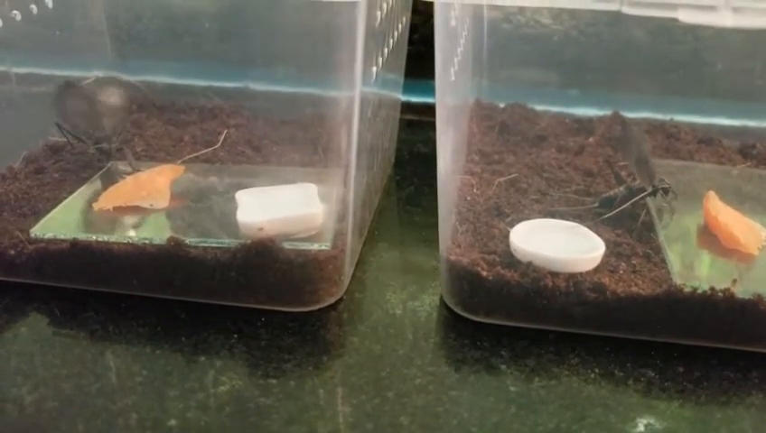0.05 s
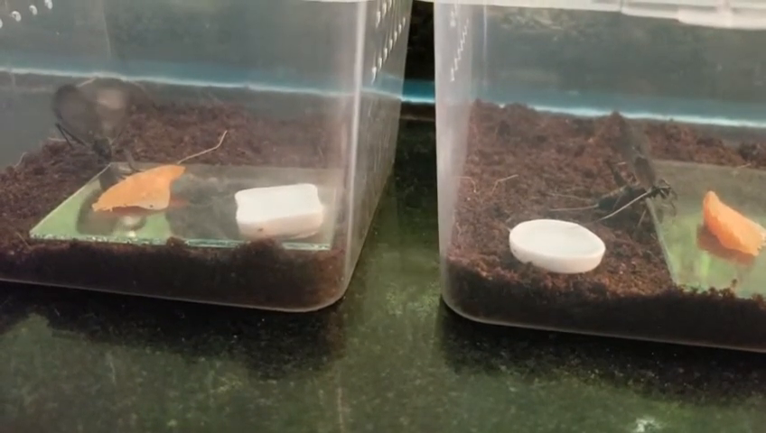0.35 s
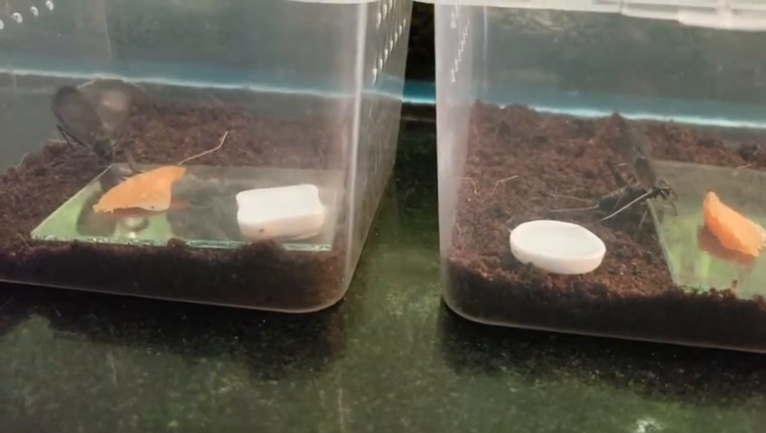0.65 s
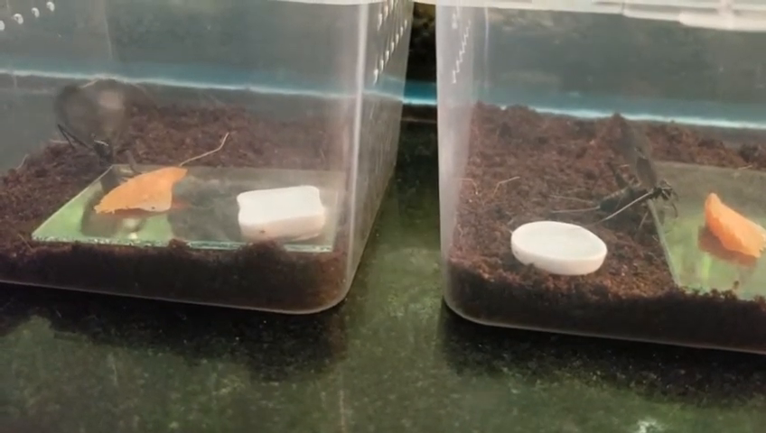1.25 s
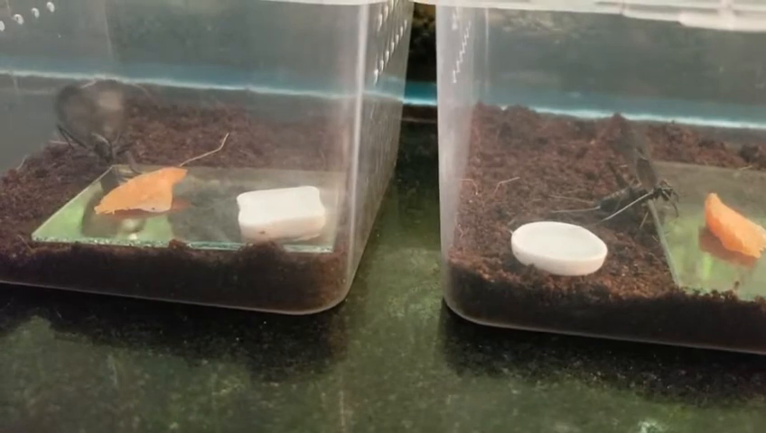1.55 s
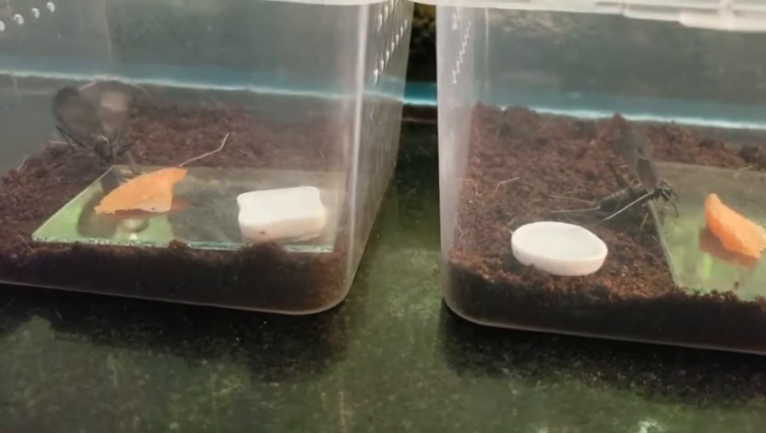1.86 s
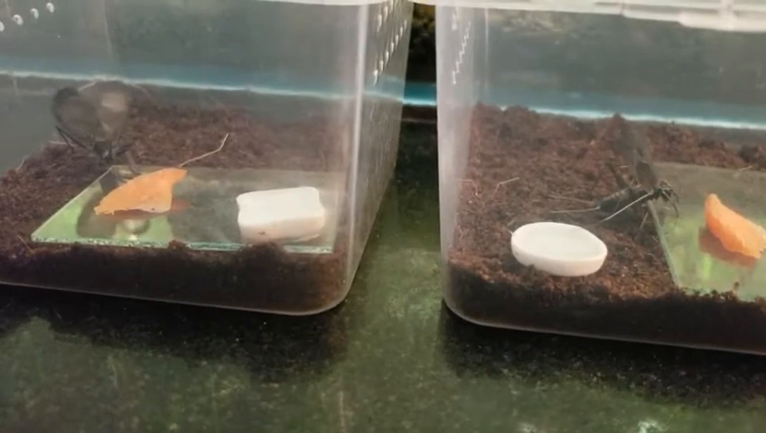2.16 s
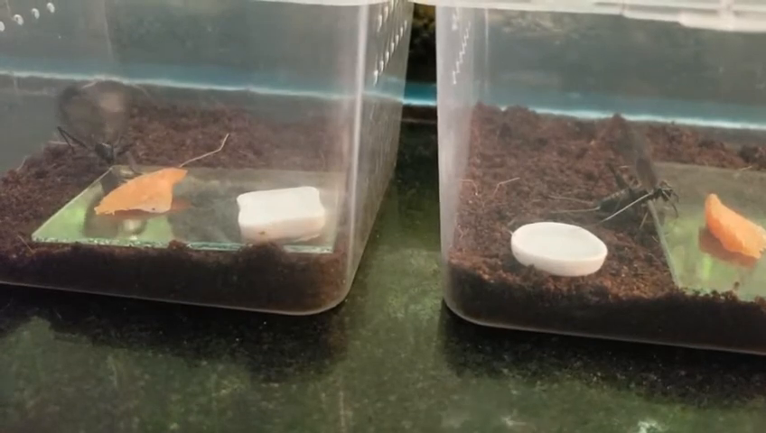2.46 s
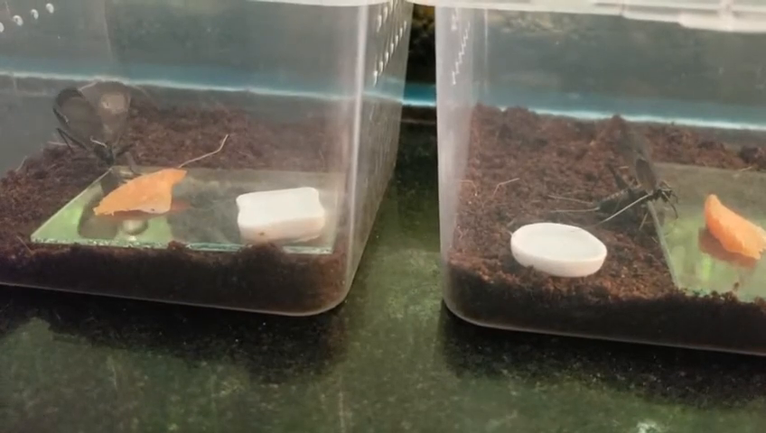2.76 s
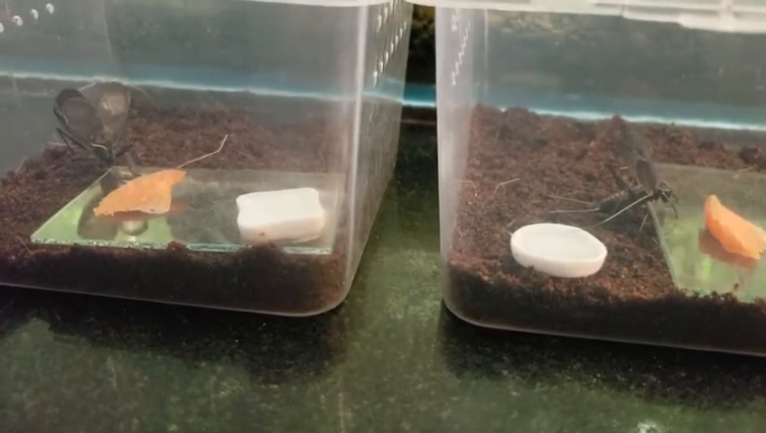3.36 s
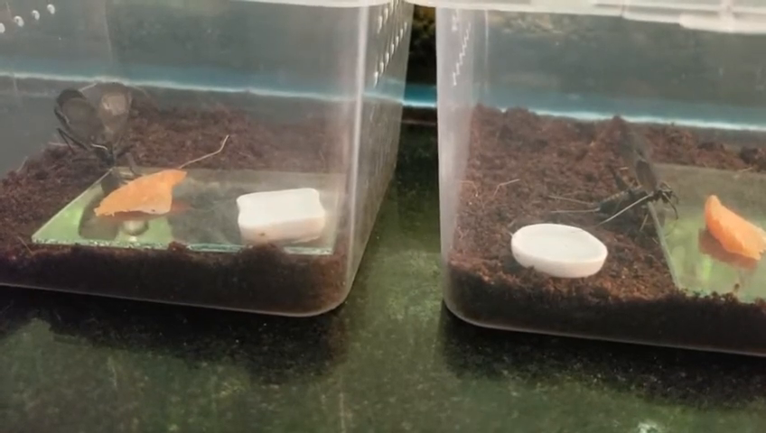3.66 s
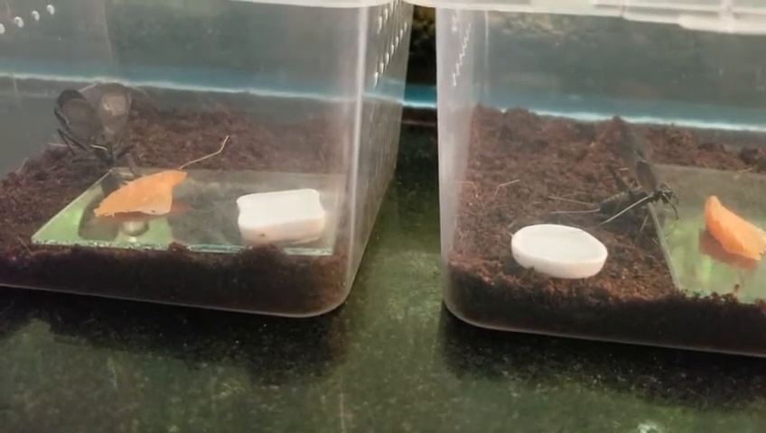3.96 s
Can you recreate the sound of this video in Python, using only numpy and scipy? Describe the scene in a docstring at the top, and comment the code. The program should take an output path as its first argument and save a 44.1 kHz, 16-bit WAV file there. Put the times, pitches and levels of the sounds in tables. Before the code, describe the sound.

Two crickets trill at a high pitch close to the microphone, the louder on the left. The song weakens into rasps and swells again twice, then stops abruptly, leaving a quiet room with a faint hum.

```python
"""Two crickets in plastic tubs

Each wing stroke draws a file over a scraper and rings the wing near 4.9 kHz. The left cricket trills;
as it tires, strokes shorten and slip into rasps. The right one cuts in with slower, falling strokes,
the left answers loudly, and the song stops dead, leaving a quiet room with a faint mains hum."""
import sys
import numpy as np
from scipy import signal
from scipy.fft import rfft, irfft
from scipy.io import wavfile

SR = 44100
rng = np.random.default_rng(int(sys.argv[2]) if len(sys.argv) > 2 else 0)


def waveform_to_disk(signal):
    """Save audio, clipped to [-1, 1], as 16-bit WAV at the path in sys.argv[1]."""
    frames = np.transpose(np.atleast_2d(signal))
    scaled = np.clip(frames, -1, 1) * 32767
    samples = np.round(scaled).astype(np.int16)
    wavfile.write(sys.argv[1], SR, samples)


N = 176400
TIME = np.arange(N) / SR
FREQS = np.fft.rfftfreq(N, 1 / SR)

# left cricket, even runs: (first stroke [s], last stroke [s], count, stroke length [s])
TRILL_RUNS = [(0.134, 0.416, 14, 0.015), (0.437, 0.647, 11, 0.014), (0.6737, 0.887, 11, 0.0061),
              (1.239, 1.508, 13, .016), (1.531, 1.84, 15, 0.015), (1.861, 2.213, 17, 0.015),
              (2.494, 2.615, 6, 0.018)]
# trill force: (time [s], relative level [dB])
TRILL_FORCE = [(.13, -19), (.23, -18), (.41, -20), (.53, -26), (.66, -28.5), (.88, -27.5), (1.24, -17.5),
               (1.58, -18.5), (1.72, -23.5), (1.98, -27), (2.14, -30), (2.22, -27.5), (2.49, -17.5),
               (2.62, -18.5)]
# trill strokes where the scraper leaves the file early: (time [s])
CUT_SHORT_TIMES = [.265, 1.396, 2.519, 2.591]
# left cricket, single strokes: (time [s], length [s], relative level [dB])
LONG_STROKES = [(0.025, 0.031, -16.5), (0.068, 0.03, -15), (0.110, 0.018, -18.5), (1.072, 0.019, -18.5),
                (1.099, 0.027, -17), (1.146, 0.021, -16), (1.185, 0.02, -16), (1.214, 0.017, -18),
                (2.241, 0.018, -21.5), (2.269, 0.021, -17), (2.314, 0.028, -15.5), (2.353, 0.022, -15),
                (2.395, 0.021, -15.5), (2.436, 0.016, -15.5), (2.467, 0.02, -16.5), (2.641, 0.021, -19)]
# strokes that slip and chirp up into a lower wing mode: (time [s], relative level [dB])
SLIPS = [(.001, -17), (.691, -29), (.753, -29), (1.82, -24), (2.018, -27), (2.086, -31.5)]
# weak spells where the wings brush as they open: (start [s], end [s])
BRUSH_SPELLS = [(.66, .9), (2.07, 2.14)]
# right cricket: (time [s], length [s], relative level [dB])
RIGHT_STROKES = [(.008, 0.048, -24.5), (.070, 0.021, -25), (.114, 0.018, -24.5), (.853, .030, -36),
                 (.894, 0.036, -22), (.938, 0.035, -19.5), (.981, 0.034, -20.5), (1.022, 0.034, -19.5),
                 (1.063, 0.030, -20), (1.104, 0.025, -20), (1.149, 0.018, -22), (2.158, 0.027, -25.5),
                 (2.193, 0.032, -21), (2.236, 0.033, -20), (2.278, 0.036, -20.5), (2.322, 0.035, -20.5),
                 (2.367, 0.036, -22), (2.417, 0.03, -24)]
# wing tones: (pitch [Hz], fall over a stroke [Hz], drop on braking [Hz], jitter [Hz], attack [s],
# release [s], centre and width of the smooth stretch [share of stroke], partials)
# partials: (multiple, relative level [dB], change in the smooth stretch [dB], L-R [dB])
# alternating strong and weak teeth give the half multiple
LEFT_TONE = dict(hz=4918.3, fall_hz=3.6, drop_hz=30, jitter_hz=31.07, attack_s=.0025, release_s=0.0025, smooth_at=0.73, smooth_width=.27, partials=[(1, -1.02, 2.5, 13.95),
             (2, -27.5, -16, 11.5), (5 / 2, -41, 0, 6), (3, -31, 4.5, 13.5)])
SLIP_TONE = dict(hz=4370, fall_hz=-220, drop_hz=60, jitter_hz=110, attack_s=.002, release_s=.0025, smooth_at=.6, smooth_width=0.402, partials=[(1, -9.5, 3.977, 7)])
RIGHT_TONE = dict(hz=4870, fall_hz=88.5, drop_hz=70, jitter_hz=41.7, attack_s=0.0027, release_s=.002, smooth_at=0.52, smooth_width=0.37, partials=[(1, -5.5, 8, -2.5),
              (2, -22.5, -19, -4.5), (3, -28.5, -3.5, 7.5)])
# wing resonances: (centre [Hz], width [Hz], relative level [dB], L-R [dB])
LEFT_MODES = [(4160, 300, -49.5, 9.5), (4398, 130, -45.5, 7), (4933, 150, -38, 5), (5600, 499, -64.5, -4),
              (6257, 450, -47, 5.5), (7450, 250, -65, -3), (9950, 2300, -62.5, 5), (12240, 150, -60.5, 5),
              (13000, 1700, -61, 13.5), (15160, 900, -61, 10)]
RIGHT_MODES = [(4300, 550, -51.5, -0.5), (5780, 1300, -48.5, -3), (12250, 220, -67, 1),
               (10900, 7400, -61, 0)]
# room air: (frequency [Hz], relative density [dB])
AIR_SPECTRUM = [(15, -5.5), (28, 4.5), (42, -7.5), (65, -13.5), (260, -13), (400, -18.5), (630, -26.5),
                (1200, -34), (2250, -28.5), (3200, -36), (7000, -40), (15000, -39)]
# room air: (frequency [Hz], L-R correlation)
AIR_CORRELATION = [(30, 0.94), (250, .75), (700, 0.47), (2000, 0.38), (12000, 0.06)]
# mains hum: (frequency [Hz], level [dB])
HUM_PARTIALS = [(50, -77.5), (100, -73.5), (150, -73), (200, -82), (250, -73), (300, -82)]
# thin, high hiss: (time [s], level [dB])
HISS_LEVEL = [(2.87, -95), (2.92, -81), (3.07, -74), (3.12, -92.5), (3.25, -94), (3.31, -77.5),
              (3.95, -75.5)]
# soft thud: (time [s], level [dB])
THUDS = [(.610, -56)]
# faint ticks in the tubs: (time [s], level [dB])
TICKS = [(2.813, -66), (3.418, -73)]


def from_db(db):
    """Decibels to gain."""
    return 10 ** (np.asarray(db) / 20)


def rms_one(x):
    """Scale to unit rms."""
    return x / np.sqrt(np.mean(x ** 2) + 1e-20)


def pan(db):
    """Stereo gains for an L-R difference."""
    return from_db(np.array([[db], [-db]]) / 2)


def filtered(x, hz, kind="low", order=2):
    """Butterworth filter."""
    return signal.sosfilt(signal.butter(order, hz, kind, fs=SR, output="sos"), x)


def band_noise(hz, width_hz, channels=2):
    """Noise band, independent per channel."""
    edges_hz = [hz - width_hz / 2, hz + width_hz / 2]
    return rms_one(filtered(rng.standard_normal((channels, N)), edges_hz, "band"))


def drift(hz):
    """Random motion below hz, unit rms."""
    return rms_one(filtered(rng.standard_normal(N), hz))


def envelope(start_s, length_s, attack_s, release_s):
    """Rise, hold, ring out."""
    age_s = TIME - start_s
    return np.clip(age_s / attack_s, 0, 1) * np.exp(-np.clip((age_s - length_s) / release_s, 0, 20))


def among(s, times_s, within_s=.012):
    """Whether the stroke at s is listed."""
    return min(abs(s - t) for t in times_s) < within_s


def radiate(x, low_cut_hz=3768):
    """Small wings radiate little bass."""
    return signal.sosfilt(signal.cheby1(8, .5, low_cut_hz, "high", fs=SR, output="sos"), x)


def wing_tone(strokes, wing, flutter_depth=.056):
    """Tone at the tooth rate; swells and steadies in the smooth stretch, teeth in step with the wing."""
    tone = np.zeros((2, N))
    jitter_hz = wing["jitter_hz"] * drift(350)
    flutter = flutter_depth * drift(500)
    for s, length_s, db in strokes:
        span = slice(int(s * SR), int((s + 2 * length_s + .02) * SR))
        progress = np.clip((TIME[span] - s) / length_s, 0, 1)
        smooth = np.exp(-((progress - wing["smooth_at"]) / wing["smooth_width"]) ** 2)
        unsteady = 1 - .6 * smooth
        glide_hz = wing["hz"] - wing["fall_hz"] * progress - wing["drop_hz"] * progress ** 8
        tooth_hz = glide_hz + unsteady * jitter_hz[span]
        phase = 2 * np.pi * (np.cumsum(tooth_hz) / SR + rng.random())
        shape = envelope(s, length_s, wing["attack_s"], wing["release_s"])[span]
        shape *= 1 + unsteady * flutter[span]
        for multiple, level_db, change_db, pan_db in wing["partials"]:
            gain = from_db(db + level_db + change_db * smooth) * pan(pan_db)
            tone[:, span] += gain * shape * np.sin(multiple * phase)
    return radiate(tone)


def scraping(strokes, energy_decay_s, bite_s, release_s, uneven_db=2.5):
    """Scrape strength: hardest at the bite, uneven along the file."""
    scrape = np.zeros(N)
    for s, length_s, db in strokes:
        force = from_db(.25 * (db + 17))   # a quarter of the tone's swing in dB
        fade = np.exp(-np.maximum(TIME - s, 0) / energy_decay_s / 2)
        scrape += force * envelope(s, length_s, bite_s, release_s) * fade
    return scrape * from_db(uneven_db * drift(120))


def rasp(scrape, modes):
    """Tooth impacts ring the wing's resonances over a faint, dull rustle."""
    ringing = sum(from_db(db) * pan(pan_db) * band_noise(hz, width_hz)
                  for hz, width_hz, db, pan_db in modes)
    rustle = from_db(-76.5) * pan(8.8) * band_noise(hz=2140, width_hz=1600)
    return radiate(scrape * ringing) + scrape * rustle


def left_cricket(far_ear_lag_s=.00038):
    """Trill, long strokes, slips and brushing wings; reaches the right ear later."""
    trill = []
    for first_s, last_s, count, length_s in TRILL_RUNS:
        for s in np.linspace(first_s, last_s, round(count)):
            share = .72 if among(s, CUT_SHORT_TIMES) else 1
            db = np.interp(s, *np.transpose(TRILL_FORCE)) + rng.normal(0, .29)
            trill.append((s, share * length_s, db))
    slip_times_s = [s for s, _ in SLIPS]
    clean = [stroke for stroke in trill if not among(stroke[0], slip_times_s)]
    tone = from_db(-4) * wing_tone(clean + LONG_STROKES, LEFT_TONE)
    slips = wing_tone([(s, .012, db) for s, db in SLIPS], SLIP_TONE, flutter_depth=.3)
    brush, opening = wing_brush(trill)
    scrape = scraping(trill + LONG_STROKES, energy_decay_s=.01, bite_s=.001973, release_s=.0059)
    near, far = tone + slips + brush + rasp(scrape + .5 * opening, LEFT_MODES)
    return np.array([near, np.pad(far, (round(far_ear_lag_s * SR), 0))[:N]])


def right_cricket():
    """Slower strokes that swell and slide down, with a broader, grittier rasp."""
    tone = wing_tone(RIGHT_STROKES, RIGHT_TONE)
    scrape = scraping(RIGHT_STROKES, energy_decay_s=.04, bite_s=.0037, release_s=.022)
    return tone + rasp(scrape, RIGHT_MODES)


def echoes(x, t60_s):
    """Dense decaying reflections, different at each ear."""
    tail = rng.standard_normal((2, SR)) * from_db(-60 * TIME[:SR] / t60_s)
    tail /= np.sqrt(np.sum(tail ** 2, axis=1, keepdims=True))
    return signal.fftconvolve(x.mean(axis=0)[None], tail, axes=1)[:, :N]


def tub_echoes(song):
    """Hard plastic walls throw the treble back longest."""
    body = from_db(-10.5) * echoes(song, t60_s=.11)
    treble = filtered(song, 11000, "high", order=10)
    return body + from_db(-9) * pan(4) * echoes(treble, t60_s=.22)


def room_tone(air_db=-63):
    """Rumbling air, mains hum and a thin hiss."""
    def per_bin(points):
        hz, value = np.transpose(points)
        return np.interp(np.log(FREQS + 1), np.log(hz), value)
    correlation = per_bin(AIR_CORRELATION)
    mid, side = rfft(rng.standard_normal((2, N)))
    stereo = np.sqrt(1 + correlation) * mid + np.sqrt(1 - correlation) * side * [[1], [-1]]
    air = from_db(air_db) * rms_one(irfft(from_db(per_bin(AIR_SPECTRUM)) * stereo, N))
    hum = sum(from_db(db) * np.sqrt(2) * np.sin(2 * np.pi * (hz * TIME + rng.random()))
              for hz, db in HUM_PARTIALS)
    hiss = from_db(np.interp(TIME, *np.transpose(HISS_LEVEL))) * band_noise(hz=13900, width_hz=1100)
    return pan(1.92) * (air + hum) + pan(3) * hiss


def small_knocks():
    """A soft thud and two tiny ticks."""
    thud = sum(from_db(db) * envelope(s, .012, attack_s=.005, release_s=.016) for s, db in THUDS)
    ticks = sum(from_db(db) * envelope(s, .0021, attack_s=.00098, release_s=.004) for s, db in TICKS)
    return ticks * band_noise(5000, 2200) + thud * band_noise(120, 100, channels=1)


def wing_brush(trill, lead_s=.008, length_s=.006):
    """Wings brush as they open before weak strokes; returns sound and envelope."""
    times_s = [s for s, _, _ in trill if any(start < s < end for start, end in BRUSH_SPELLS)]
    opening = sum(from_db(rng.normal(0, 1.5)) * envelope(s - lead_s, length_s, .001, .002)
                  for s in times_s)
    brush = opening * from_db(-49) * pan(6) * band_noise(hz=3964, width_hz=270)
    return radiate(brush), opening


def scene():
    """Both crickets, their tubs and the room."""
    song = left_cricket() + right_cricket()
    tubs = tub_echoes(song)
    room = from_db(-15) * echoes(filtered(song, hz=6400), t60_s=.33)
    return song + tubs + room + room_tone() + small_knocks()


def record(dry):
    """Steep low-pass at 15.85 kHz."""
    return signal.sosfilt(signal.ellip(12, .1, 80, 15850, fs=SR, output="sos"), dry)


dry = scene()
out = record(dry)
waveform_to_disk(out)
```